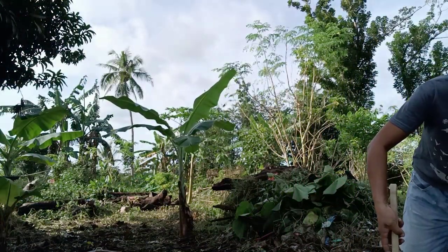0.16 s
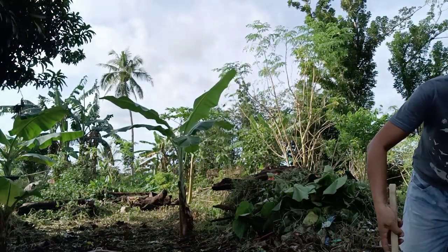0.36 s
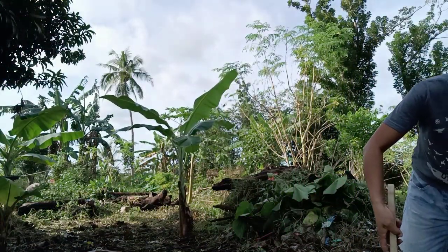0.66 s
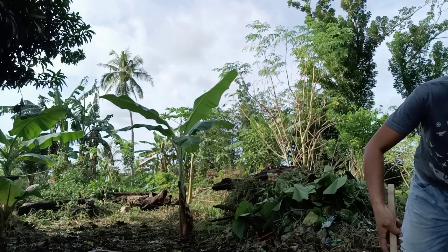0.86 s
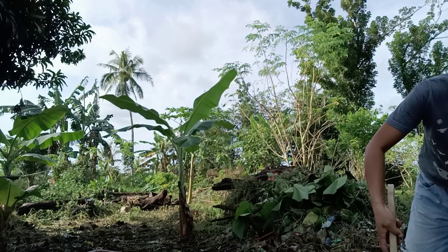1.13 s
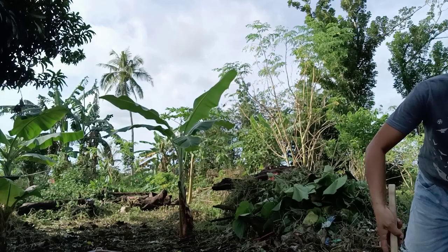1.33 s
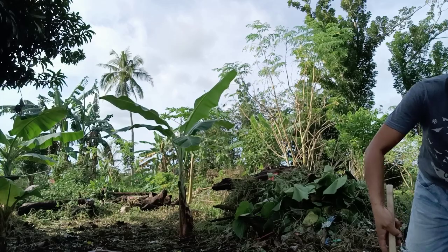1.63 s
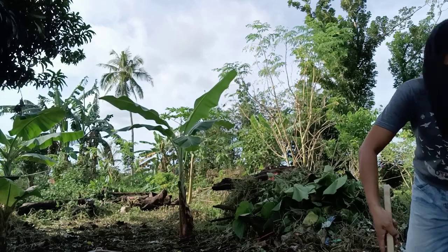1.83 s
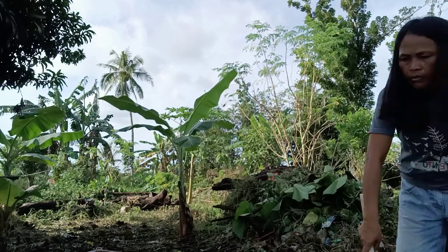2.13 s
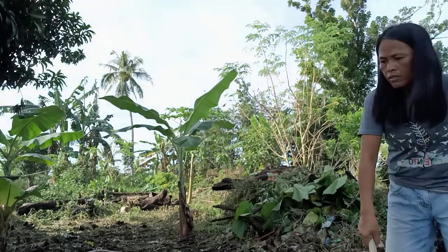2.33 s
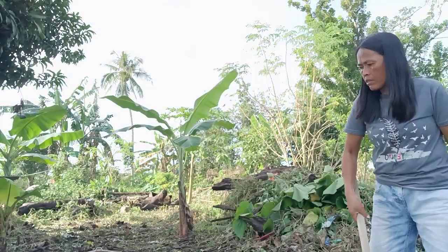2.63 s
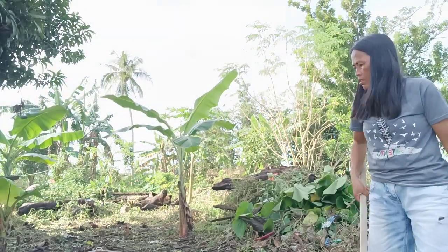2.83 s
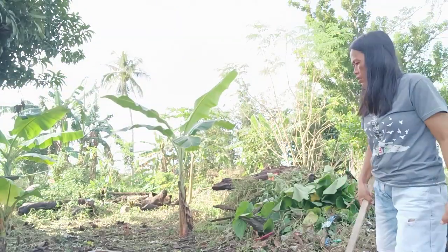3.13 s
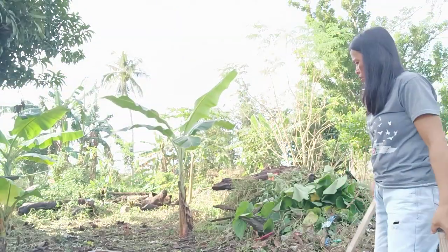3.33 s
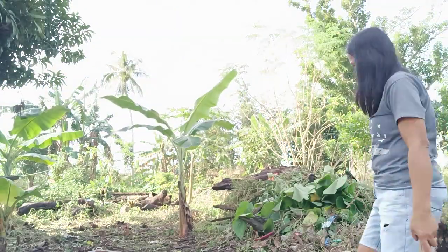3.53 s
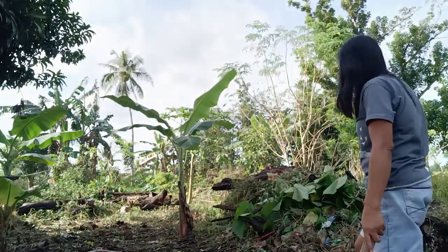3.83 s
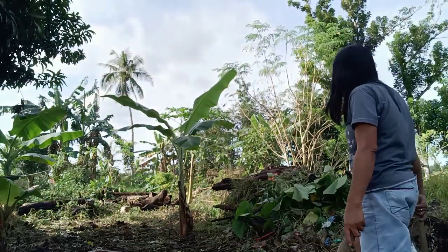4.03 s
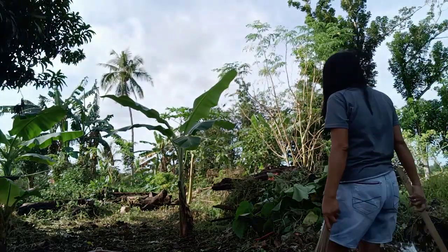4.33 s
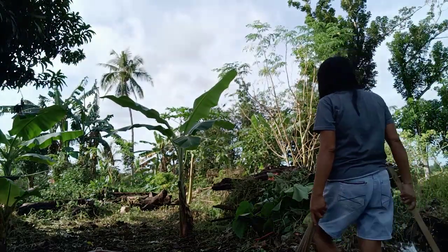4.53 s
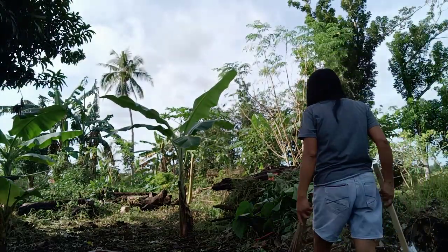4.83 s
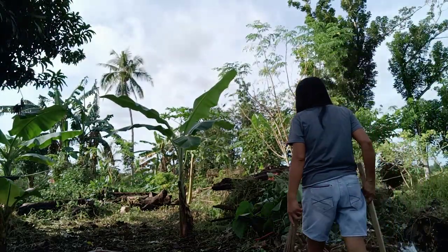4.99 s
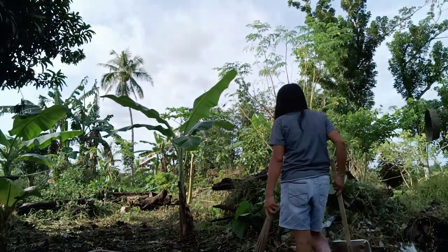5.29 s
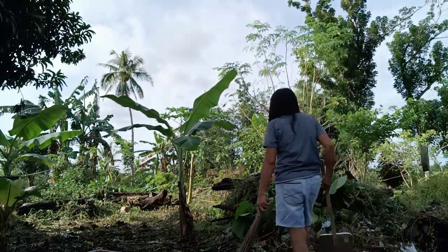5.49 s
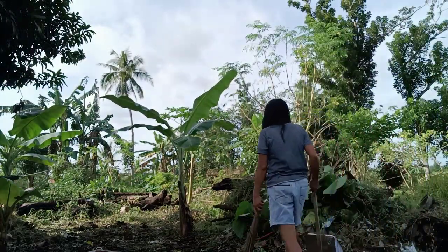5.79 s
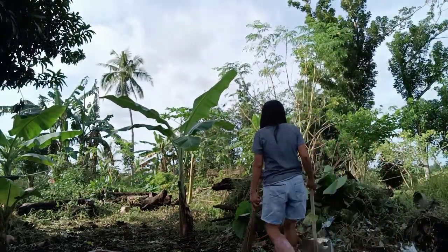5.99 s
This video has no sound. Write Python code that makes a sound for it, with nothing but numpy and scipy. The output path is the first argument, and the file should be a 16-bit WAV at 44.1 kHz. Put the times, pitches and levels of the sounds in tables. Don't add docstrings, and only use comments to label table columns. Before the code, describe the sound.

A close stereo pickup in an open yard, with faint airy garden hush and almost no echo. From 0 to 1.8 s a twig broom works through dry leaves: a swelling hissy stroke around 0.3 s bursts into crunch at 0.43, litter tumbles near 0.8, a stroke follows at 1.0 and another at 1.6, with bristles flicking and ticking. A twig snaps at 1.9 and the level falls sharply. At 2.2-2.35 s an empty pan drags and knocks lightly. At 3.0 s a hard hollow wood-on-plastic clack rattles and rings briefly; pan scrapes sing at 3.4-3.75. Small rustles, twig ticks and soft heel thuds continue from 4 s, with a crisp crackle at 4.96 and a stronger crunching step around 5.7. A far, hoarse cockerel clucks at 5.25 and crows faintly from 5.45 to 6.05, to the right.

```python
import sys
import numpy as np
from scipy import signal
from scipy.fft import rfft, irfft, next_fast_len
from scipy.io import wavfile
from scipy.ndimage import uniform_filter1d, map_coordinates

SR = 44100
rng = np.random.default_rng(int(sys.argv[2]) if len(sys.argv) > 2 else 0)


def natural_amplitude(level_db):
    exponent = np.asarray(level_db, float) / 20
    return 10 ** exponent


def wav_out(sig):
    wavfile.write(sys.argv[1], SR, np.round(np.clip(np.atleast_2d(sig).T, -1, 1) * 32767).astype(np.int16))


N = 271215
SWEEPING_ENDS_S = 1.83
STROKE_SOIL_DB = -35


def unit(x):
    return x / np.sqrt(np.mean(x ** 2) + 1e-20)


def along(points, hz):
    f, v = np.transpose(points)
    return np.interp(np.log(hz + 1), np.log(f + 1), v)


def curves(rows, s):
    t, *cols = np.transpose(rows)
    return [np.interp(s, t, c) for c in cols]


def filtered(x, response):
    m = next_fast_len(N + SR // 2)
    return irfft(rfft(x, m) * response(np.fft.rfftfreq(m, 1 / SR)), m)[..., :N]


def resonances(modes):
    def response(f):
        total = 0
        for k, (centre, width, db) in enumerate(modes):
            damping = 1j * f * width
            total = total + (-1) ** k * natural_amplitude(db) * damping / (centre ** 2 - f ** 2 + damping)
        return total
    return response


def pulses(s, size, lead_ms):
    out, taps = [], np.arange(-7, 9)
    for side in (-1, 1):
        at = (s + side * lead_ms / 2000) * SR
        index = np.floor(at).astype(int)[:, None] + taps
        d = index - at[:, None]
        weight = size[:, None] * np.sinc(d) * np.cos(np.pi * d / 16) ** 2
        out.append(np.bincount(np.clip(index, 0, N).ravel(), weight.ravel(), N + 1)[:N])
    return np.array(out)


def patchy(x, depth_db):
    z = signal.stft(x, nperseg=512)[2]
    field = uniform_filter1d(rng.standard_normal(z.shape[1:]), size=5, axis=0)
    field = uniform_filter1d(field, size=5, axis=1)
    return signal.istft(z * natural_amplitude(depth_db * unit(field)), nperseg=512)[1][:, :N]


# t/s, left lead/ms
BEARING = [(0, .23), (.26, .28), (.45, .17), (.95, .255), (1.2, .3), (1.43, .285), (1.6, .185), (2.3, .17),
           (2.8, .3), (3.0, .12), (3.2, .39), (3.34, .1), (3.79, .15), (3.84, .33), (4.2, .14), (4.42, .3),
           (5.0, .27), (6.15, .16)]
# from/s, to/s, left lead/ms
ASIDE = [
    (0.144, 0.234, -0.38),
    (0.563, 0.903, -0.38),
    (1.29, 1.42, -0.35),
    (1.833, 2.107, -0.32),
    (2.463, 2.682, -0.36),
    (2.998, 3.13, 0.093),
    (4.044, 4.126, 0.13),
    (4.822, 4.86, -0.076),
    (5.06, 5.25, 0.032),
]


def bearing(s):
    lead = curves(BEARING, s)[0]
    for start, end, lead_ms in ASIDE:
        lead = np.where((s >= start) & (s < end), lead_ms, lead)
    return lead, lead < 0


# from/s, to/s
HEAPING = [
    (.435, .58),
    (1.76, 1.83),
]


def patch_width(s):
    scatter_wider = 5
    broom_heads = np.where((s > .9) & (s < 1.28), 1.6, 1)
    for start, end in HEAPING:
        broom_heads = np.where((s > start) & (s < end), scatter_wider / 2, broom_heads)
    scattered = bearing(s)[1] | (s > SWEEPING_ENDS_S) | (s < ASIDE[0][0])
    return np.where(scattered, scatter_wider, broom_heads)


# f/Hz, level/dB
GARDEN = [(20, 2), (60, 3), (200, -4), (500, -14.5), (1500, -20.5), (4000, -18.5), (8000, -26.5),
          (16000, -28)]
# f/Hz, correlation
ALIKE = [(60, 0.45), (240, 0.87), (950, -0.49), (3770, -0.21), (15000, 0.56)]


def garden():
    gusts = map_coordinates(rng.standard_normal(60), [np.arange(N) * 8 / SR])

    def mid_side(hz):
        turn = np.arccos(np.clip(along(ALIKE, hz), -1, 1)) / 2
        return natural_amplitude(along(GARDEN, hz)) * [np.cos(turn), np.sin(turn)]

    mid, side = filtered(rng.standard_normal((2, N)), mid_side)
    return natural_amplitude(-59 + 0.58 * gusts) * unit(patchy(np.array([mid + side, mid - side]), depth_db=3.5))


def move(layers, near, shape_db, crunch_db, hiss_db, heap_db):
    fine_db = hiss_db - 0.57 * np.clip(crunch_db - hiss_db, -15, 15)
    layers[:, near] += natural_amplitude([[crunch_db], [hiss_db], [heap_db], [fine_db]]) * natural_amplitude(shape_db)


def around(s):
    return slice(max(round((s - .4) * SR), 0), round((s + .5) * SR))


# t/s, level/dB
RUSTLE = [(0, -50.5), (.14, -58), (.55, -48), (.72, -44), (1.3, -55.5), (1.4, -82), (1.8, -51),
          (2.1, -74.5), (2.45, -70.5), (2.75, -69), (3.1, -62), (3.5, -65), (4.0, -58), (4.36, -69),
          (4.75, -63.5), (5.25, -68), (5.6, -82), (5.85, -64), (6.15, -61)]


def settling(layers, now):
    move(layers, slice(N), curves(RUSTLE, now)[0], crunch_db=-4.5, hiss_db=0, heap_db=-6)
    layers[3] *= natural_amplitude(3)


# middle t/s, half length/s, hiss/dB, leaves over hiss/dB
STROKES = [(0.0, 0.1, -43.5, -10), (0.335, .12, -23.5, -9.5), (1.015, 0.12, -24.5, -6.5),
           (1.144, 0.084, -37.5, -9.5), (1.572, 0.16, -27.5, -11), (2.939, 0.074, -58.5, -7.5),
           (3.21, 0.11, -59, -31), (3.878, 0.043, -49.5, -10), (4.131, 0.05, -61.5, -19),
           (4.243, 0.043, -51.5, -18), (4.45, 0.054, -59.5, -10), (4.588, 0.037, -67, -26),
           (4.895, 0.1, -62.5, -12.5), (6.16, 0.021, -55, -2)]


def strokes(layers, now):
    edge_db, squareness, trail = 31, 3.2, 0.89
    for s, half, hiss_db, leaves_db in STROKES:
        off = (now[around(s)] - s) / half
        shape_db = -edge_db * np.maximum(-off, off / trail) ** squareness
        move(layers, around(s), shape_db, hiss_db + leaves_db, hiss_db, hiss_db + STROKE_SOIL_DB)


# peak t/s, crunch/dB, hiss/dB, heap/dB, t60/s
PILES = [(0.196, -45, -56, -33.5, 0.28), (0.443, -23.5, -25, -23.5, 0.27), (0.466, -28, -33.5, -28.5, 0.08),
         (0.611, -35.5, -36, -50, 0.21), (0.812, -32, -33, -31.5, 0.51), (1.602, -25.5, -30.5, -31.5, 0.24),
         (1.645, -50, -46, -34, 0.25), (1.689, -51, -42, -40.5, 0.16), (1.749, -40.5, -41.5, -67, 0.088),
         (1.912, -27, -28.5, -30, 0.33), (2.204, -64, -63.5, -49, 0.38), (2.331, -58.5, -58, -59, 0.34),
         (2.533, -54, -53, -59, 0.26), (2.968, -44.5, -43, -48, 0.18), (3.019, -39.5, -68, -27, 0.15),
         (3.727, -81, -65, -42.5, 0.07), (4.502, -56, -55.5, -64, 0.15), (4.71, -73, -61, -59, 0.048),
         (4.964, -56, -58, -57, 0.26), (5.701, -52, -44.5, -50, 0.11), (5.744, -44, -49.5, -39, 0.22),
         (6.052, -77, -44, -50, 0.046)]


def piles(layers, now):
    rise_over_fall = 0.46
    for s, crunch_db, hiss_db, heap_db, t60 in PILES:
        off = (now[around(s)] - s) / t60
        move(layers, around(s), -60 * np.maximum(-off / rise_over_fall, off), crunch_db, hiss_db, heap_db)


# t/s, crunch/dB, hiss/dB, heap/dB, t60/s
STAMPS = [(0.175, -42, -73, -22, 0.14), (0.4254, -36, -17, -23, 0.11), (0.758, -16, -15, -18.5, 0.22),
          (1.147, -36, -22.5, -73, 0.26), (1.324, -33, -41.5, -36, 0.3), (1.408, -56, -28.5, -39, 0.087),
          (1.8, -29.5, -34, -66, 0.094), (2.1798, -59, -62, -53, 0.14), (2.3241, -38, -44, -31, 0.11),
          (2.5186, -42, -35, -55, 0.068), (3.1864, -75, -31, -49, 0.13), (3.2294, -52, -46, -44, 0.13),
          (3.3, -36.5, -43, -61, 0.076), (3.615, -38.5, -39, -32.5, 0.075), (3.813, -75, -43, -77, 0.059),
          (4.0194, -46, -37.5, -71, 0.1), (4.1094, -42, -57, -71, 0.047), (4.479, -61, -39, -68, 0.14),
          (4.5994, -72, -44, -46, 0.058), (4.958, -26, -30, -60, 0.043), (5.689, -22.5, -54, -20, 0.077),
          (6.027, -58, -35, -34, 0.084)]


def stamps(layers, now):
    rise_s = .003
    for s, crunch_db, hiss_db, heap_db, t60 in STAMPS:
        after = slice(round(s * SR), round(s * SR) + SR // 4)
        age = np.abs(now[after] - s) + 1 / SR
        shape_db = -11 - 60 * age / t60 + 20 * np.log10(1 - np.exp(-age / rise_s))
        move(layers, after, shape_db, crunch_db, hiss_db, heap_db)


# t/s, peak/dB
CATCHES = [(0.1928, -35), (0.2208, -30), (0.2223, -29), (0.2338, -30), (0.245, -18.5), (0.2625, -21.5),
           (0.2767, -22.5), (0.2996, -12.5), (0.4348, -7), (0.582, -45), (0.6029, -20), (0.7601, -25),
           (0.806, -9), (0.8918, -34), (0.9117, -11), (0.9266, -8.5), (0.9651, -29), (0.9854, -14),
           (1.1444, -21), (1.1576, -19), (1.2425, -36), (1.2534, -29), (1.284, -30), (1.3253, -40),
           (1.3895, -31), (1.4141, -38), (1.4595, -33), (1.463, -25), (1.4814, -21), (1.5245, -18),
           (1.5827, -9), (1.6066, -18), (1.6727, -13), (1.7259, -24), (1.7403, -36), (1.754, -30),
           (1.7997, -24), (1.8251, -30), (1.8411, -29), (1.8601, -37), (1.873, -12), (1.9074, -19)]


def catches(layers, now):
    gain_db, t60_s = -21.5, 0.044
    for s, db in CATCHES:
        after = slice(round(s * SR), round(s * SR) + SR // 10)
        shape_db = db + gain_db - 60 * np.abs(now[after] - s) / t60_s
        move(layers, after, shape_db, crunch_db=-6, hiss_db=0, heap_db=STROKE_SOIL_DB)


def grains(count, spectrum, spiky_db, clumps_db, spread_ms):
    s = rng.random(count) * N / SR
    size = rng.exponential(size=count)
    place, sign = rng.standard_normal((2, count))
    clump = map_coordinates(rng.standard_normal(600), [s * 90])
    size = np.sign(sign) * natural_amplitude(spiky_db * np.minimum(size, 4.5) + clumps_db * clump)
    cracks = pulses(s, size, bearing(s)[0] + spread_ms * place * patch_width(s))
    return unit(filtered(cracks, lambda hz: natural_amplitude(along(spectrum, hz))))


# f/Hz, level/dB
BRISTLES = [(400, -62), (1200, -30), (2500, -3.5), (5000, 1), (8000, 0), (16000, -1)]


def bristle_tips(hiss, sizzle, now):
    on_right = uniform_filter1d(1. * bearing(now)[1], size=1500)
    sizzle = sizzle * natural_amplitude(-1.5 - 7 * on_right - 5 * (now > SWEEPING_ENDS_S))
    tips = grains(count=70000, spectrum=BRISTLES, spiky_db=-0.5, clumps_db=0.82, spread_ms=.017)
    tips = patchy(tips, depth_db=1.03)
    finest = filtered(tips, lambda hz: 1 / (1 + (11400 / (hz + 1)) ** 8))
    return natural_amplitude(1.0) * (hiss * (tips - finest) + sizzle * finest)


# f/Hz, level/dB
LEAVES = [(400, -21), (1200, -3), (2200, 6.5), (4000, 4), (7000, -15), (16000, -20)]


def dry_leaves(crunch):
    cracks = grains(count=30000, spectrum=LEAVES, spiky_db=-1.0, clumps_db=1.0, spread_ms=.027)
    return crunch * patchy(cracks, depth_db=3.5)


# f/Hz, level/dB
SOIL = [(40, 0.5), (120, -3.5), (280, 1), (600, -2.5), (1100, -0.5), (2000, -9), (5000, -43)]


def heap_on_soil(push):
    scrapes = grains(count=9000, spectrum=SOIL, spiky_db=0.0, clumps_db=1.0, spread_ms=.027)
    return natural_amplitude(-4.0) * push * patchy(scrapes, depth_db=3.0)


def broom():
    now = np.arange(N) / SR
    layers = np.zeros((4, N))
    settling(layers, now)
    for movement in (strokes, piles, stamps, catches):
        movement(layers, now)
    crunch, hiss, push, sizzle = layers
    return bristle_tips(hiss, sizzle, now) + dry_leaves(crunch) + heap_on_soil(push)


def contacts(s, db, t60, count, chatter_db):
    delay, strength = np.moveaxis(rng.standard_normal((len(s), 2, count)), 1, 0)
    later = np.abs(delay) * t60[:, None] * 0.3
    size = strength * natural_amplitude(db[:, None] + chatter_db - 60 * later / t60[:, None])
    later[:, 0], size[:, 0] = 0, natural_amplitude(db)
    return pulses((s[:, None] + later).ravel(), size.ravel(), np.repeat(bearing(s)[0], count))


# t/s, peak/dB, floor share/dB
KNOCKS = [(0.175, -26, -23), (2.179, -56.5, 2), (2.208, -49.5, 3), (2.324, -29.5, -31), (2.349, -35.5, -30),
          (2.9985, -31, -14), (3.003, -33, -16), (3.243, -52, -21), (3.303, -46, -26), (3.349, -50, -19),
          (3.411, -48, -35), (3.613, -42, -19), (3.632, -53, -8), (3.71, -34.5, -16), (3.738, -38, -15),
          (3.758, -47, -0.5), (4.938, -47, -24), (5.914, -64, 11)]
# f/Hz, width/Hz, level/dB
PAN_WALL = [(930, 92, -1), (977, 84, 5), (1180, 36, 4), (2070, 54, -11.5), (2310, 230, -9.5)]
# f/Hz, width/Hz, level/dB
PAN_FLOOR = [(275, 40, 3), (422, 25, -8), (528, 24, 5)]


def pan_knocks():
    s, db, floor_db = np.transpose(KNOCKS)
    t60 = np.full(len(s), .07)
    wall = contacts(s, db + 31.0, t60, count=8, chatter_db=0.0)
    floor = contacts(s, db + floor_db + 45.5, t60, count=8, chatter_db=-10.5)
    return filtered(wall, resonances(PAN_WALL)) + filtered(floor, resonances(PAN_FLOOR))


# f/Hz, t60/s
TREES = [(200, 0.32), (2000, 0.064), (10000, 0.13)]


def trees(x):
    hz, t, z = signal.stft(rng.standard_normal((2, SR // 3)), SR, nperseg=256)
    tail = signal.istft(z * natural_amplitude(-60 * t / along(TREES, hz)[:, None]), SR, nperseg=256)[1]
    delayed = np.pad(x, ((0, 0), (200, 0)))
    return signal.fftconvolve(delayed, tail / np.linalg.norm(tail[0]), axes=1)[:, :N]


def pops(events, gain_db, noisy):
    out, t = np.zeros((2, N + SR)), np.arange(SR // 10) / SR
    for s, db, hz, t60 in events:
        pole = np.exp(-2 * np.pi * 0.87 * hz / SR)
        crack = signal.lfilter([1, -1], [1, -pole], rng.standard_normal(len(t)))
        crack = signal.lfilter(*signal.butter(2, min(3.5 * hz / SR, .9)), crack)
        decay = natural_amplitude(db + gain_db - 60 * t / max(t60, .002))
        pop = decay * (np.sin(2 * np.pi * hz * t) + noisy * unit(crack))
        half = bearing(s)[0] * SR / 2000
        out[0, round(s * SR - half):][:len(t)] += pop
        out[1, round(s * SR + half):][:len(t)] += pop
    return out[:, :N]


# t/s, peak/dB, f/Hz, t60/s
STEPS = [(1.234, -45, 218, 0.012), (4.489, -47.5, 230, 0.09), (4.538, -41.5, 270, 0.032),
         (4.616, -56, 318, 0.019), (4.706, -47, 960, 0.022), (4.707, -48.5, 450, 0.02),
         (5.544, -54.5, 1000, .015), (5.856, -56, 1300, 0.026), (5.693, -36, 1500, .03),
         (0.2, -36, 270, .12), (5.186, -57, 1610, .02), (2.178, -45, 596, .03), (1.24, -49, 726, 0.054),
         (6.049, -44, 1080, 0.027), (4.751, -49, 275, 0.031), (5.069, -42.5, 148, 0.031),
         (5.546, -68.5, 196, 0.027), (5.692, -39, 243, 0.16), (5.733, -25, 1180, 0.023),
         (5.752, -37, 237, 0.08), (5.855, -49, 168.5, 0.29), (6.048, -31.5, 528, 0.035),
         (6.054, -37, 230, 0.054)]


def footsteps():
    return pops(STEPS, 0.57, noisy=0.19)


# t/s, peak/dB, f/Hz, t60/s
SNAPS = [(1.0155, -37, 10000, 0.007), (1.6074, -36, 9900, 0.007), (1.7535, -30, 6800, 0.0025),
         (1.9118, -19, 2780, 0.0091), (2.5394, -41, 3130, 0.028), (2.9254, -38.5, 5520, 0.011),
         (2.9703, -23, 6650, 0.0031), (3.6154, -45, 9460, .006), (3.6468, -43, 9310, 0.0054),
         (3.7102, -35, 10700, 0.011), (3.8124, -40, 14000, .008), (3.8128, -46, 6450, .01),
         (3.888, -35.5, 6730, .012), (4.0284, -43, 6950, 0.0064), (4.4969, -42.5, 6800, 0.0087),
         (3.3021, -46, 6100, .01), (4.0711, -29, 2300, 0.015), (4.0716, -29.5, 1680, 0.01),
         (4.2107, -45, 7270, 0.0055), (4.4398, -41, 2000, 0.012), (4.8419, -42, 1910, 0.0096),
         (4.9588, -35, 6700, 0.0064), (4.9608, -32.5, 6400, 0.0073), (5.022, -32.5, 6800, 0.0099),
         (5.0424, -49, 3470, 0.0062), (5.1396, -33.5, 12000, 0.0023), (5.1866, -42, 6140, 0.0074),
         (5.6358, -41.5, 6770, 0.011), (5.697, -43, 2430, 0.011), (5.7238, -36, 3840, 0.012),
         (5.7667, -30.5, 3220, 0.0084), (5.9923, -45, 8100, 0.007), (6.1105, -46, 6850, 0.0061)]


def twigs():
    return pops(SNAPS, 0.356, noisy=0.26)


# t/s, length/s, level/dB, f/Hz
PAN_DRAGS = [(2.19, 0.055, -23, 507), (2.205, .035, -26, 1157), (2.245, .06, -26, 994),
             (2.276, .035, -18, 297), (3.347, 0.04, -32, 1025), (3.395, .065, -23.5, 974),
             (3.47, .04, -36, 1080), (3.457, .05, -38, 930), (3.521, .095, -31, 1027),
             (3.634, .075, -33, 1190), (3.407, 0.036, -35, 724), (3.526, .03, -35, 2370),
             (3.614, .04, -35, 1990), (3.704, 0.039, -20, 1015), (3.715, 0.049, -24, 1140),
             (3.745, .06, -36, 527), (3.763, 0.051, -30.5, 391)]


def pan_drags():
    out = 0
    for s, length, db, hz in PAN_DRAGS:
        share, size = rng.random(100), rng.standard_normal(100)
        at = s + share * length
        scratches = pulses(at, size * natural_amplitude(db + 10.0) * np.sin(np.pi * share) ** .5, bearing(at)[0])
        ring = signal.iirpeak(hz, 21, SR)
        out = out + signal.lfilter(*ring, signal.lfilter(*ring, scratches))
    return out


# t/s, peak/dB, rattle t60/s
BLOW = [
    (3.0108, -7.5, 0.02),
    (3.0146, -6.5, 0.03),
    (3.018, -11, .02),
    (3.0215, -11.5, 0.03),
    (3.026, -14, .03),
    (3.032, -22, 0.051),
    (3.044, -23, 0.05),
    (3.065, -30, .05),
]
# f/Hz, level/dB, t60/s
HANDLE = [(431, -22, 0.12), (711, -9, 0.21), (821, -8.5, 0.25), (885, -6.5, 0.042), (1080, -18, 0.12),
          (1180, -12, 0.14), (1140, -21, 0.13), (1650, -9, 0.104), (1910, -12, 0.25), (2370, -23, 0.23)]


def handle_blow():
    s, db, t60 = np.transpose(BLOW)
    handle = [(hz, 3.5 / min(life, .11), level) for hz, level, life in HANDLE]
    blow = contacts(s, db, t60, count=8, chatter_db=-3)
    blow = filtered(blow, lambda hz: 1 / (1 + 1j * hz / 4300) ** 3)
    crack = filtered(blow, resonances([(1020, 310, 23.4), (2900, 2200, 21)]))
    return crack + natural_amplitude(34.5) * filtered(blow, resonances(handle))


# t/s, f/Hz, second partial/dB
CLUCK = [
    (5.225, 870, -90),
    (5.25, 876, -69),
    (5.305, 890, -74),
    (5.34, 895, -95),
]
# t/s, f/Hz, second partial/dB
CROW = [
    (5.445, 815, -90),
    (5.465, 828, -60),
    (5.525, 862, -57),
    (5.59, 865, -71),
    (5.68, 845, -70),
    (5.8, 832, -68),
    (5.86, 825, -62),
    (5.99, 806, -64),
    (6.07, 800, -85),
]


def cockerel():
    lead_ms, chest_leads_s = -0.43, 0.015
    cluck_chest_db, crow_chest_db = 2, -18
    now = np.arange(N) / SR
    hz, second_db = curves(CLUCK + CROW, now)
    first_db = curves(CLUCK + CROW, now + chest_leads_s)[1]
    first_db = first_db + np.where(now < CROW[0][0], cluck_chest_db, crow_chest_db)
    hoarse = unit(uniform_filter1d(rng.standard_normal((2, N)), size=420, axis=1))
    turn = 2 * np.pi * np.cumsum(hz * (1 + .009 * hoarse[0])) / SR
    turn = turn + 2 * np.pi * hz * lead_ms / 2000 * np.array([[1], [-1]])
    flutter_db = 4.2 * hoarse[1]
    voice = natural_amplitude(first_db) * np.sin(turn) + natural_amplitude(second_db) * np.sin(2 * turn)
    return np.sqrt(2) * natural_amplitude(flutter_db) * voice


def scene():
    hits = pan_knocks() + pan_drags() + handle_blow() + footsteps()
    light = twigs() + cockerel()
    near = broom() + hits + light + natural_amplitude(-8.0) * trees(hits + light / 3)
    return filtered(near, lambda hz: (1j * hz / (90 + 1j * hz)) ** 2) + garden()


# f/Hz, level/dB
LEFT_PORT = [(1000, 1), (4500, 0.5), (5200, 2), (7000, 8.5), (8400, -4), (10500, 3.5), (12500, 4.5),
             (14000, 10), (15400, 12), (15800, -13), (16300, -46)]
# f/Hz, level/dB
RIGHT_PORT = [(1000, 1.5), (4500, -2.5), (5800, -3.5), (6800, -8.5), (8500, 7.5), (12200, -1),
              (13800, -10.5), (14500, -14), (15200, -36.5), (16000, -71)]


def port_colour(dry):
    return filtered(dry, lambda hz: natural_amplitude([along(LEFT_PORT, hz), along(RIGHT_PORT, hz)]))


def low_pass(x):
    return signal.sosfilt(signal.butter(12, 16850, fs=SR, output="sos"), x)


def record(dry):
    ports = port_colour(dry)
    return low_pass(ports)


dry = scene()
out = record(dry)
wav_out(out)
```